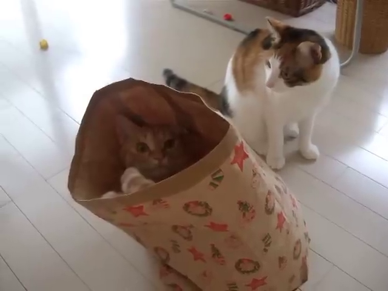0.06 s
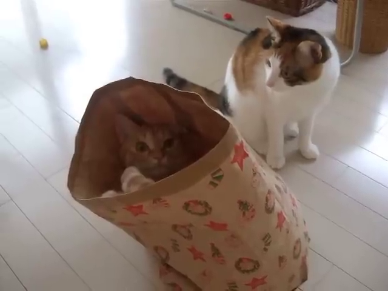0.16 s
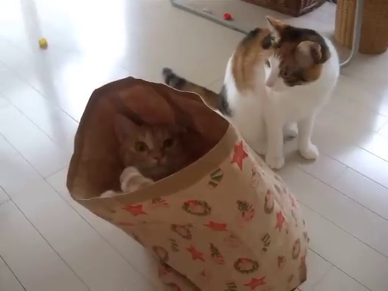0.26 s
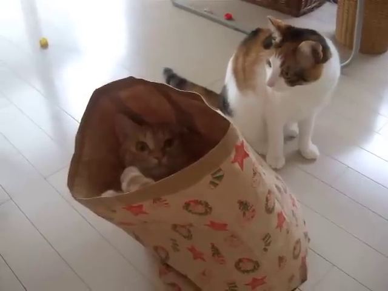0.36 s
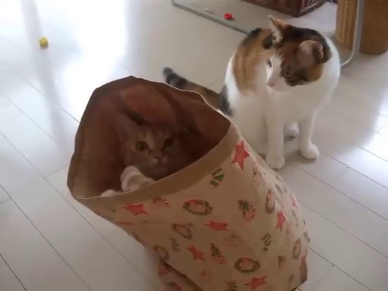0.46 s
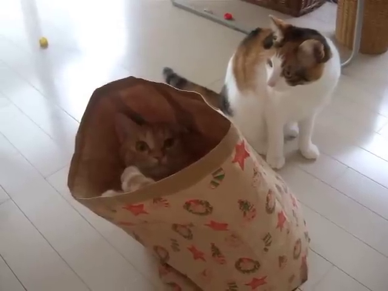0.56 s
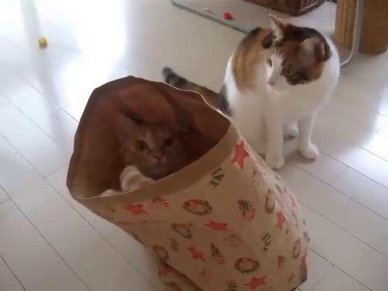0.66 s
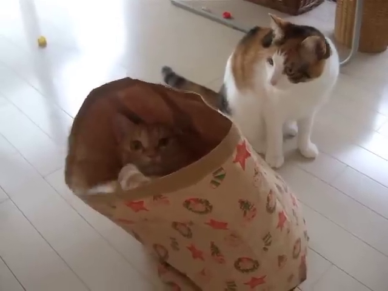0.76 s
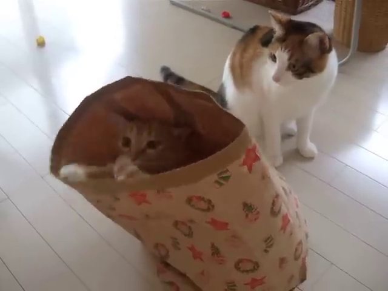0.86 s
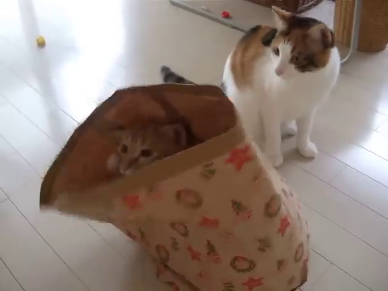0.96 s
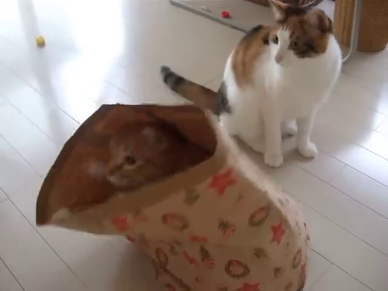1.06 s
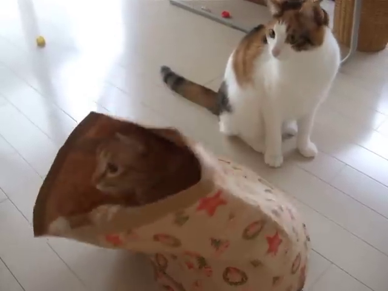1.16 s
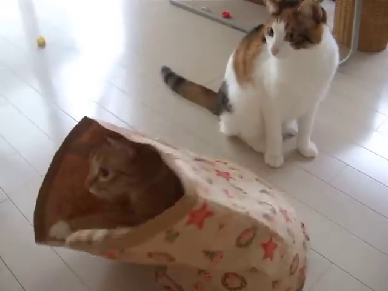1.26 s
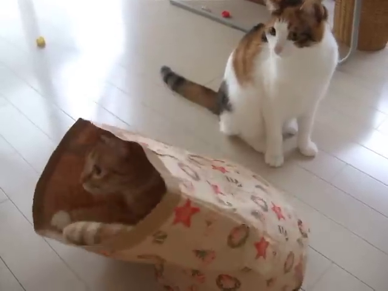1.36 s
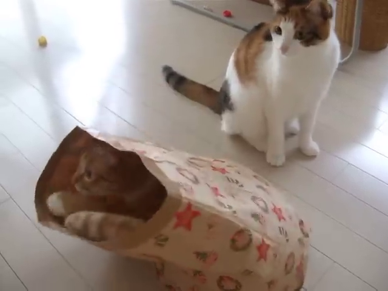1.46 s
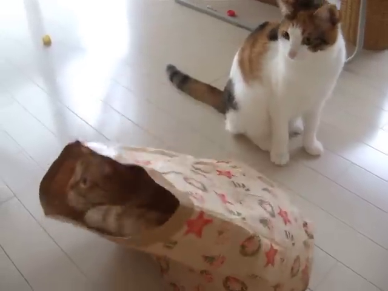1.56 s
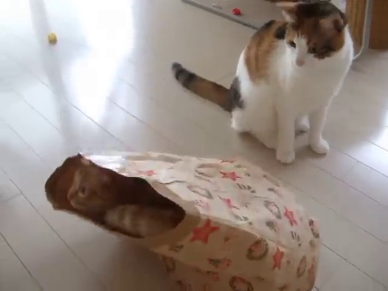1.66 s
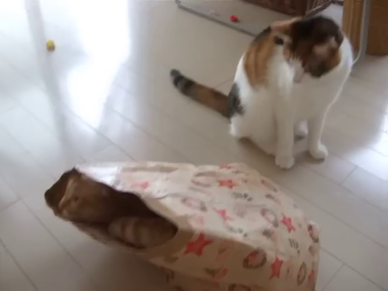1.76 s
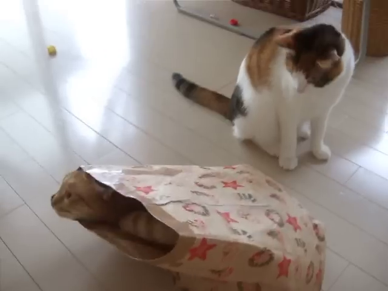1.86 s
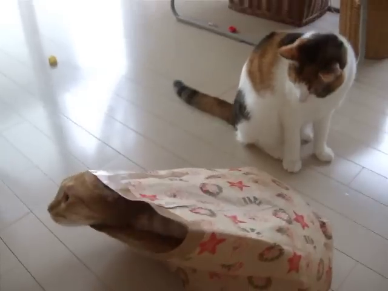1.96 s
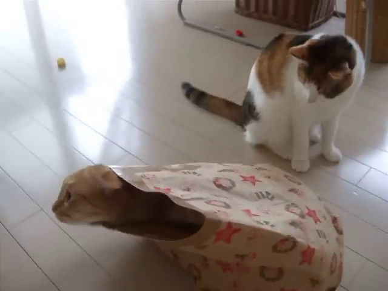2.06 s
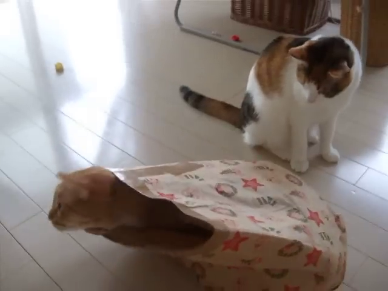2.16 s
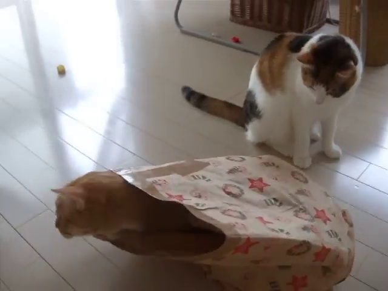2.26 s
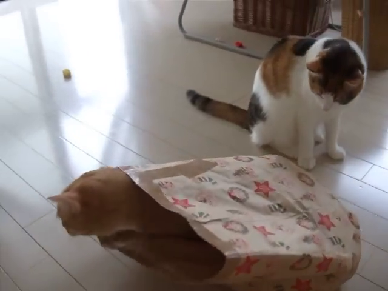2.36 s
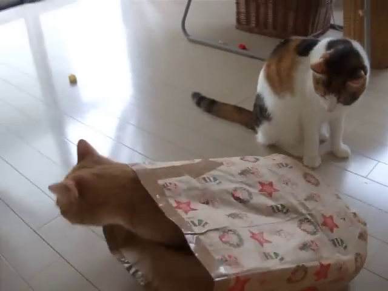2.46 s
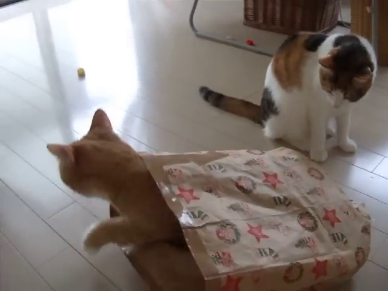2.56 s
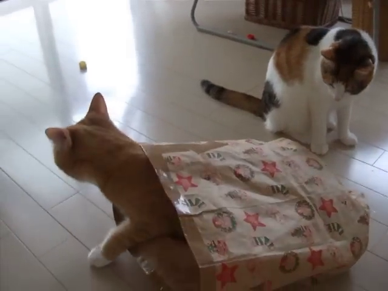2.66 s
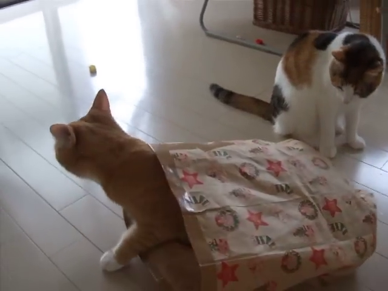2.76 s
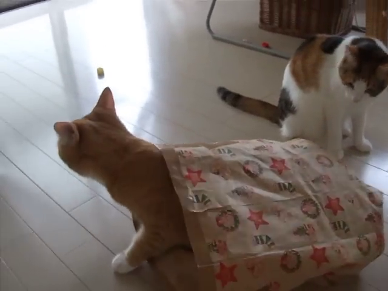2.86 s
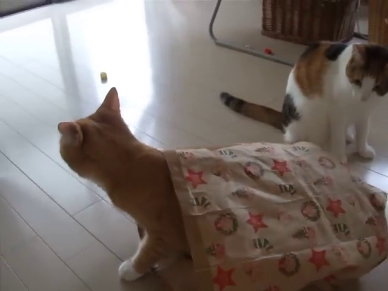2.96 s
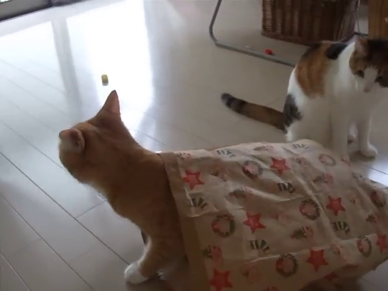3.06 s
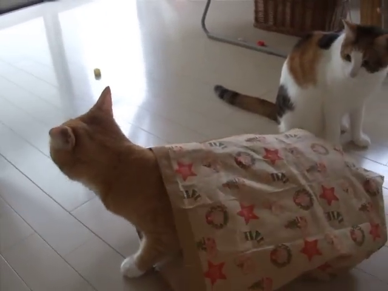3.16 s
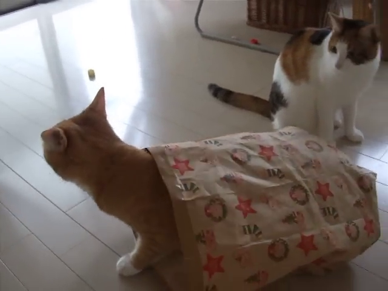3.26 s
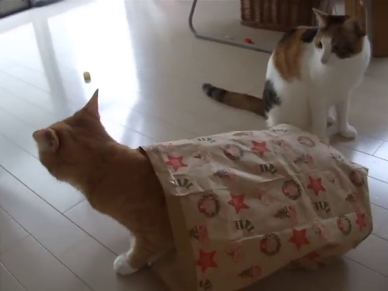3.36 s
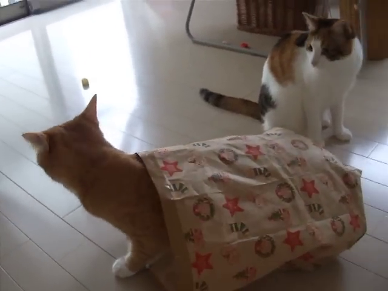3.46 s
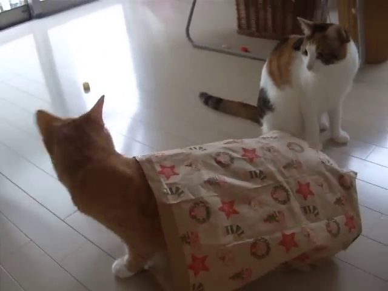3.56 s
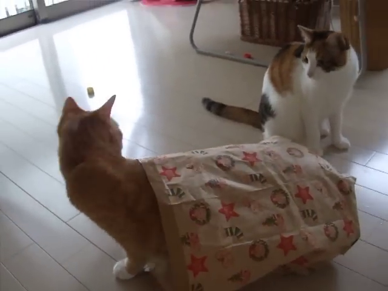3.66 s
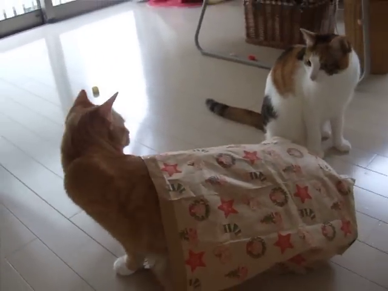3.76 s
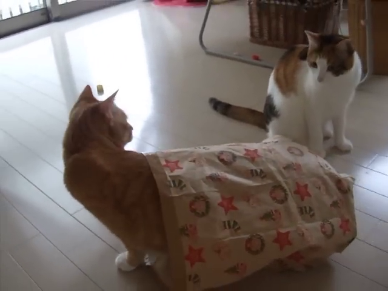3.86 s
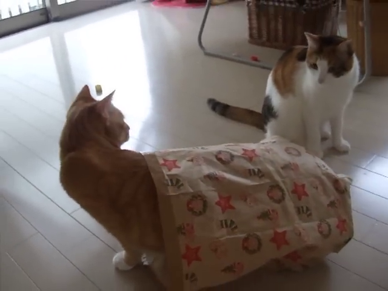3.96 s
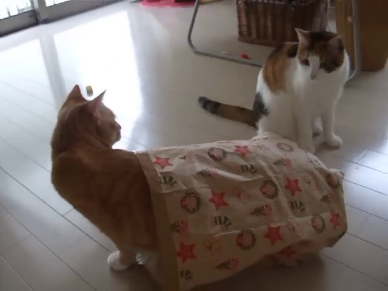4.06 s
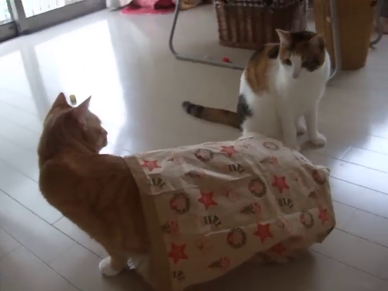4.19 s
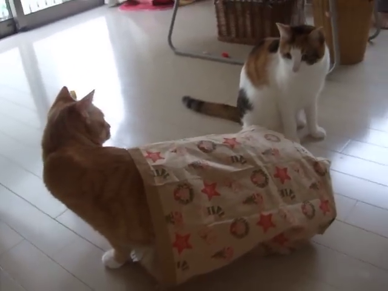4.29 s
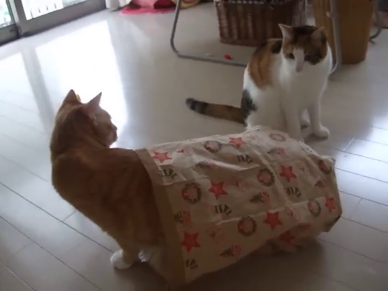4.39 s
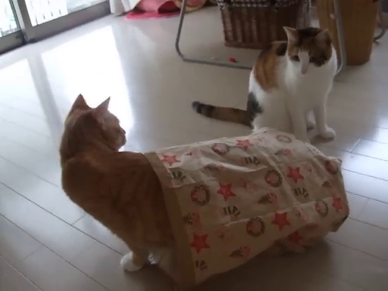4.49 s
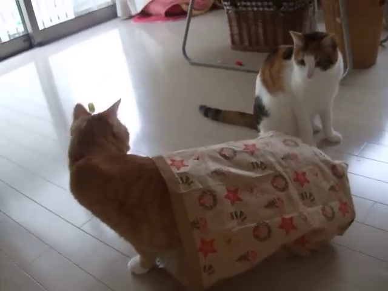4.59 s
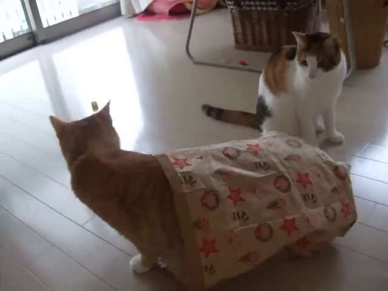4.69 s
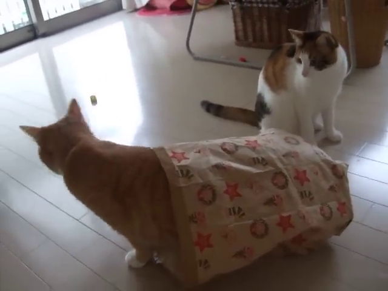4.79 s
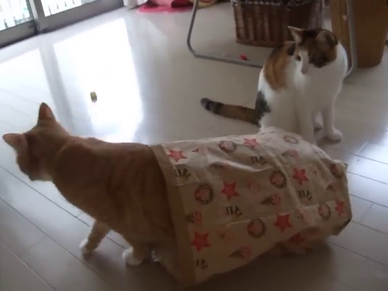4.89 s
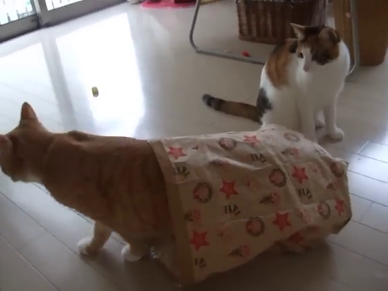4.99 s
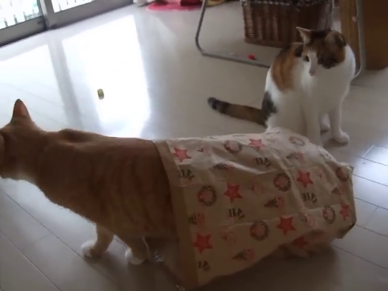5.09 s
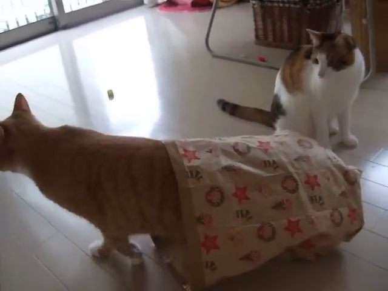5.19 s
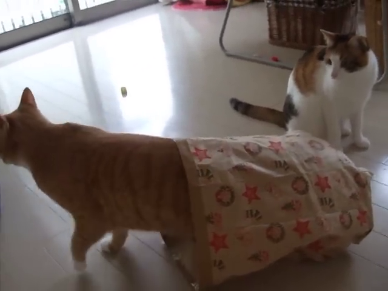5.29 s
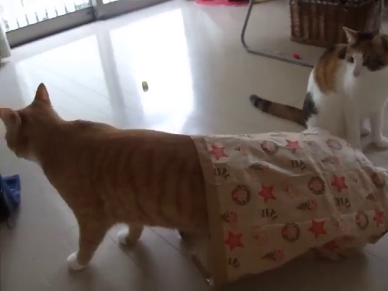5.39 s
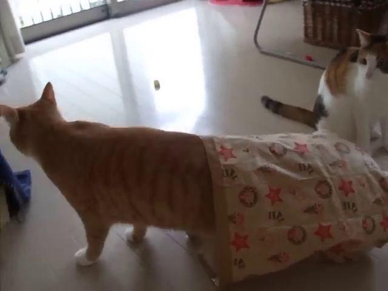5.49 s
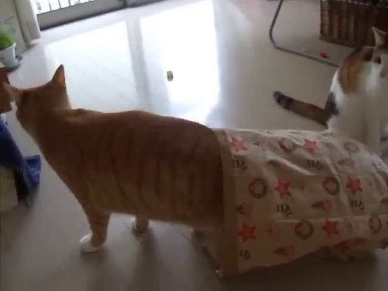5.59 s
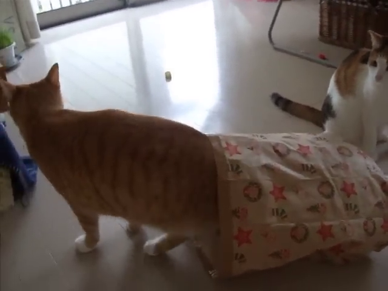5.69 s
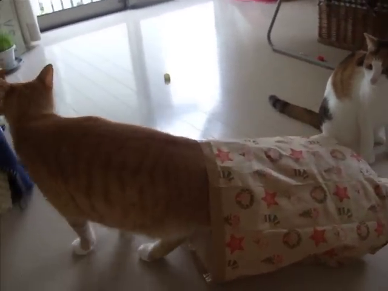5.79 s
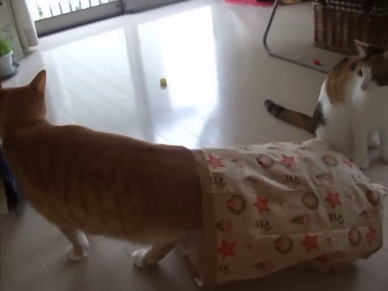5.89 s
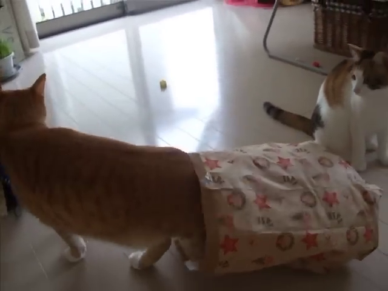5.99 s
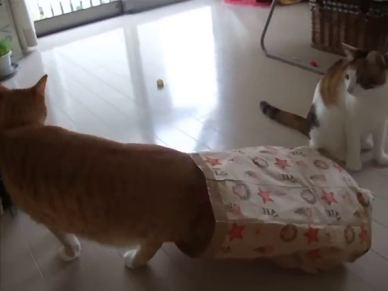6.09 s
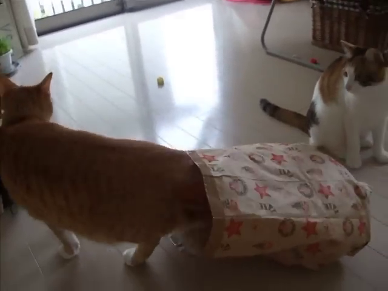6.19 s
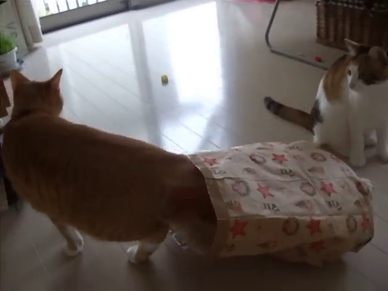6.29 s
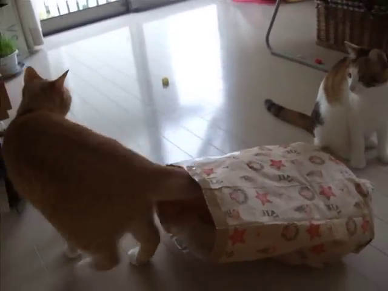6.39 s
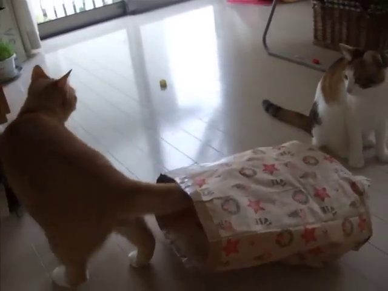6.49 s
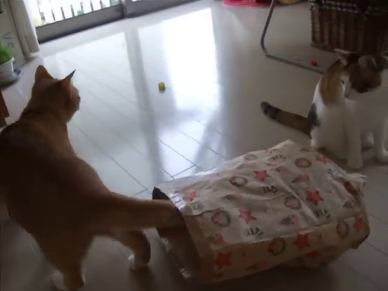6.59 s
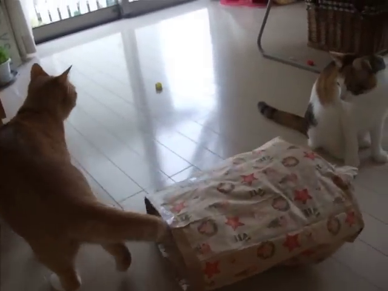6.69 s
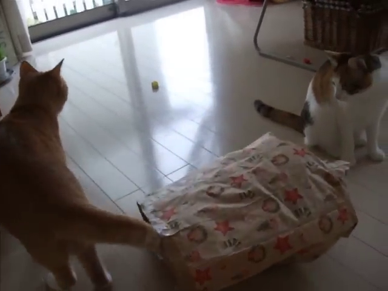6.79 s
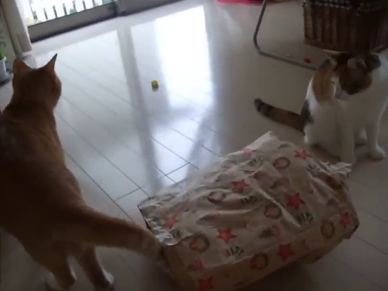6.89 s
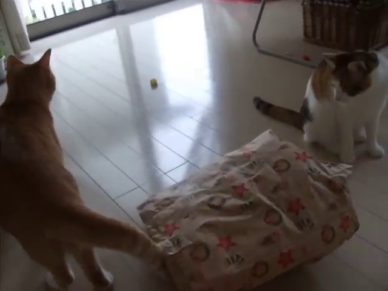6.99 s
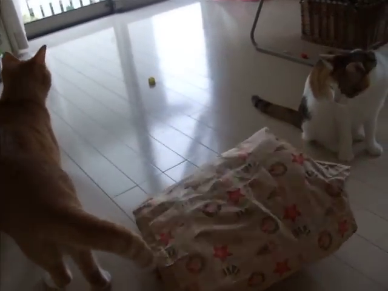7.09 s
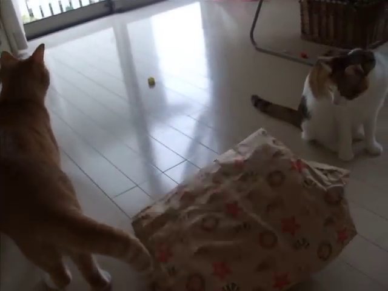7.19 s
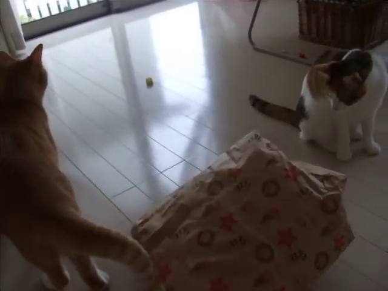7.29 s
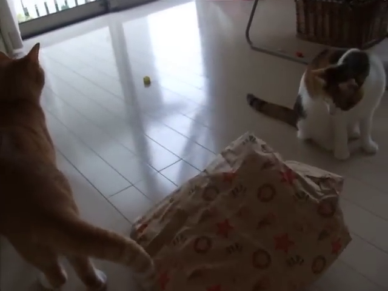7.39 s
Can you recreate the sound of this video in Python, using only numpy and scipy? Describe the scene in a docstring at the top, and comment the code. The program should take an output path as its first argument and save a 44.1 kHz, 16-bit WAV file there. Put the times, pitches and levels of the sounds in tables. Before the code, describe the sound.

A small indoor room with a wooden floor, heard through a modest camera microphone with faint, grainy hiss and limited treble. Almost quiet until 0.75 s, when a cat starts scrambling in a stiff paper bag. A very sharp cluster of snaps hits at 0.9-1.05 s, followed by uneven crackles, flexing panels and dry sliding rustle. From 1.8 to 2.6 s the crinkling is dense again, with soft patter as the bag tips onto the boards; snaps thin out by 3.4 s. Short room reflections follow them. Afterwards come sparse, soft bumps and light paper brushes, with deep booming knocks through the camera from 3.25 s, strongest near 4.2 s. Two crisp snaps stand out at 4.65 and 4.75 s. Around 7.0 s a brief, dry, high creak slips right at the microphone, leaving a faint metal ring. A last small paper snap and bump come at 7.4 s.

```python
"""A small live room with a wooden floor: a faint hiss of shaped noise, then a cat scrambles in a stiff paper
bag. Creases snap as millisecond noise bursts, panels crinkle in clumps of tiny clicks, and paper slides as a
dense hiss. As the bag tips over it patters on the boards; soft bumps, each a short damped swing, go on as the
cat walks out. Deep booming knocks come through the camera body from midway, followed by fainter low booms. Near
the end something creaks right at the microphone, sticking and slipping, and leaves a faint metal ring; the room
answers the bag, and one late snap follows."""
import sys
import numpy as np
from scipy import signal
from scipy.fft import rfft, irfft
from scipy.io import wavfile
from scipy.ndimage import map_coordinates

SR = 44100
rng = np.random.default_rng(int(sys.argv[2]) if len(sys.argv) > 2 else 0)


def wav_out(sig):
    """Save sig, one row per channel (or a flat mono array), as 16-bit PCM at SR to the path in sys.argv[1]."""
    wavfile.write(sys.argv[1], SR, np.round(np.clip(np.atleast_2d(sig).T, -1, 1) * 32767).astype(np.int16))


N = 328358
TIME = np.arange(N) / SR
BURST_TIME = TIME[:2048]


def from_db(db):
    """Turn decibels into an amplitude factor."""
    return 10 ** (np.asarray(db) / 20)


def rms_one(x):
    """Scale a sound to rms 1."""
    return x / np.sqrt(np.mean(x ** 2) + 1e-20)


def at_hz(points, hz):
    """Read a table on a log-frequency axis."""
    table_hz, value = np.transpose(points)
    return np.interp(np.log(np.maximum(hz, 1)), np.log(table_hz), value)


def causal_response(spectrum, size=2048):
    """Minimum-phase impulse response of a spectrum: nothing sounds before the blow."""
    hz = np.maximum(np.arange(size // 2 + 1) * SR / size, 1)
    octaves_outside = np.abs(np.log2(hz / np.clip(hz, spectrum[0][0], spectrum[-1][0])))
    # beyond the table the level falls 10 dB per octave, for two octaves
    level_db = at_hz(spectrum, hz) - 10 * np.minimum(octaves_outside, 2)
    cepstrum = irfft(np.log(from_db(level_db)))
    # folding the cepstrum onto positive time gives minimum phase
    cepstrum[1:size // 2] *= 2
    cepstrum[size // 2 + 1:] = 0
    return irfft(np.exp(rfft(cepstrum)))


def through(x, response):
    """Convolve, keeping the length."""
    return signal.oaconvolve(x, response)[:len(x)]


def drift(rate_hz):
    """Slow chance joining random knots of spread 1 by straight lines."""
    knots = rng.standard_normal(2000)
    return np.interp(TIME * rate_hz, np.arange(len(knots)), knots)


def add(out, s, sound):
    """Mix a sound in at time s."""
    i = max(round(s * SR), 0)
    out[i:i + len(sound)] += sound[:N - i]


def burst(response, rise_s, decay_s, jolt=0.0):
    """A quick run of tiny slips around one main jolt, through a body; its energy equals rms 1 over 10 ms."""
    rise = np.minimum(BURST_TIME / rise_s, 1) ** 2
    swell = rise * np.exp(-np.maximum(BURST_TIME - rise_s, 0) / decay_s)
    force = rng.standard_normal(len(BURST_TIME)) * swell / np.sqrt(np.sum(swell ** 2))
    force[np.argmax(swell)] += jolt * rng.choice([-1, 1])
    sound = through(force, response)
    return sound / np.sqrt(np.sum(sound ** 2) / (SR / 100))


def ring(hz, t60, t):
    """One mode dying by 60 dB in t60 seconds."""
    return np.sin(2 * np.pi * hz * t) * from_db(-60 * t / t60)


def grains(per_s, spread_db):
    """Clumps of tiny clicks of very unequal size; rms 1."""
    chance, size, sign = rng.random((3, N))
    born = chance < per_s * from_db(4 * drift(30)) / SR
    clicks = np.zeros(N)
    loudness_db = spread_db * np.minimum(-np.log(1 - size[born]), 3.5)
    clicks[born] = from_db(loudness_db) * np.sign(sign[born] - .5)
    return rms_one(clicks)


# Microphone noise and room rumble. Each row: frequency in Hz, relative density in dB per Hz.
HISS_SPECTRUM = [(15, -33), (25, -11.5), (46, -0.5), (120, -2), (200, -7.5), (360, -5.5), (700, -6.5),
                 (1400, -11), (2500, -11.5), (4000, -13), (7200, -11.5), (8200, -13)]
HISS_DB = -56


def hiss():
    """Faint microphone noise over a low room rumble, both one shaped white noise."""
    noise = through(rng.standard_normal(N), causal_response(HISS_SPECTRUM, size=8192))
    return from_db(HISS_DB) * rms_one(noise)


# How hard the cat works the bag. Each row: time in seconds, panel flexing and sliding in dB before each layer's trim.
SCRAMBLE_EFFORT = [(0.76, -50.5, -47.5), (0.9, -44, -42.5), (0.959, -28, -45.5), (1.119, -37.5, -47),
                   (1.2, -32, -38), (1.32, -41.5, -52), (1.38, -35.5, -40), (1.5, -49.5, -44),
                   (1.94, -32, -45.5), (2.159, -47, -36), (2.519, -33, -47.5), (2.74, -55.5, -50),
                   (2.86, -47.5, -50), (2.92, -43.5, -52), (3.079, -39.5, -42.5), (3.22, -52.5, -70),
                   (3.36, -44, -67.5), (3.46, -76, -65)]


def effort(t):
    """Levels in dB of flexing and sliding at time t; silent outside the scramble."""
    s, flexing, sliding = np.transpose(SCRAMBLE_EFFORT)
    return [np.interp(t, s, level, left=-200, right=-200) for level in (flexing, sliding)]


# Stiff facets of paper between creases. Each row: pitch in Hz, relative level in dB.
FACET_MODES = [(1500, -6), (2100, 4), (2900, -1.5), (4100, 1.5), (5600, 0), (7400, 5)]


def crinkle(per_s=230, cycles=6.1):
    """Small buckles, each ticking at the pitch of the facet where it happens; rms 1."""
    clicks = grains(per_s, spread_db=4.5)
    facet = rng.integers(0, len(FACET_MODES), N)
    ticks = [from_db(db) * rms_one(ring(hz, cycles / hz, TIME[:512])) for hz, db in FACET_MODES]
    return rms_one(sum(through(clicks * (facet == k), tick) for k, tick in enumerate(ticks)))


# Bag panels flexing; snaps shift it in pitch. Each row: frequency in Hz before that shift, relative dB per Hz.
FLEX_SPECTRUM = [(60, -17.5), (150, -16), (300, -5.5), (520, -6), (760, 2.5), (1030, 2), (1350, -12.5),
                 (1900, -19.5)]
# Paper dragged over fur and boards. Each row: frequency in Hz, relative density in dB per Hz.
SLIDE_SPECTRUM = [(200, -7.5), (800, 8), (1500, 8.5), (2200, 0), (4400, 6.5), (8200, 7)]


def scramble(panel_db=-9.5, crinkle_db=-9.5, slide_db=-2.5):
    """Flexing panels knock and crinkle in clumps; paper dragged over fur and boards gives a fine hiss."""
    flexing, sliding = from_db(effort(TIME))
    panels = rms_one(through(grains(per_s=170, spread_db=1.0), causal_response(FLEX_SPECTRUM)))
    slips = grains(per_s=6000, spread_db=3.0)
    slide = rms_one(through(slips, causal_response(SLIDE_SPECTRUM)))
    panel_layer = flexing * from_db(panel_db) * panels
    slide_layer = sliding * from_db(slide_db) * slide
    crinkle_layer = np.sqrt(flexing * sliding) * from_db(crinkle_db) * crinkle()
    return panel_layer + slide_layer + crinkle_layer


# The fallen bag pattering on the boards. Each row: frequency in Hz, relative density in dB per Hz.
PATTER_SPECTRUM = [(90, -9.5), (150, -1.5), (330, -1), (520, -5), (900, -28.5)]
TIP_START_S, TIP_END_S = 0.71, 2.63


def patter(patter_db=-14.5):
    """The further the bag has tipped, the louder its flexing panels pat the floor."""
    fallen = np.interp(TIME, [TIP_START_S, TIP_END_S], [0, 1])
    pats = rms_one(through(grains(per_s=90, spread_db=3.0), causal_response(PATTER_SPECTRUM)))
    return fallen * from_db(effort(TIME)[0] + patter_db) * pats


def small_snaps(count=50, crack_db=3.0, flex_db=2.5, edge_db=-7.0, spread_db=2.5):
    """Lesser creases give way at uneven moments all through the scramble, as hard as the paper is being worked."""
    when, size, brightness = rng.random((count, 3)).T * 2 - 1
    # one snap falls at a random moment within each of the equal slots
    slot = np.arange(count) + (1 + when) / 2
    s = np.interp(slot, [0, count], [SCRAMBLE_EFFORT[0][0], SCRAMBLE_EFFORT[-1][0]])
    flexing, sliding = effort(s)
    crack = flexing + crack_db + spread_db * (size + brightness)
    flex = flexing + flex_db + spread_db * size
    edge = sliding + edge_db + spread_db * (size + brightness)
    return np.transpose([s, crack, flex, edge])


# Loud creases buckling. Each row: time in seconds, then crack, panel flex and bright edge in dB before trim.
LOUD_SNAPS = [(0.7706, -35, -46, -43), (0.9193, -25, -34, -36), (0.9338, -16.5, -29, -30.5),
              (0.9466, -5.5, -27, -15.5), (0.9832, -8, -28, -14), (0.993, -16.5, -25.5, -18),
              (1.0266, -16.5, -20.5, -37), (1.1164, -30.5, -28, -46), (1.1822, -15, -30.5, -19.5),
              (1.2208, -13, -30.5, -22.5), (1.2461, -22, -28.5, -41), (1.3204, -22, -35.5, -40),
              (1.3568, -17.5, -32, -23.5), (1.4002, -17.5, -38.5, -25.5), (1.5421, -16.5, -34.5, -25.5),
              (1.6079, -21, -33.5, -48), (1.699, -17.5, -26.5, -21), (1.7283, -23.5, -32.5, -41),
              (1.8051, -28, -25, -34.5), (1.8206, -15.5, -35.5, -30), (1.8787, -19, -27, -25),
              (1.8875, -20, -28, -24.5), (1.915, -20, -25.5, -32), (1.93, -15.5, -25.5, -25.5),
              (1.9447, -13.5, -21, -22.5), (1.96, -14.5, -26.5, -23.5), (2.0008, -25.5, -23.5, -29),
              (2.016, -15, -33, -22.5), (2.0923, -31, -29.5, -39.5), (2.1964, -25.5, -33.5, -37),
              (2.2117, -21.5, -37, -36.5), (2.2619, -23, -26, -26), (2.2828, -13.5, -31, -25),
              (2.2959, -12, -27.5, -16.5), (2.3276, -9.5, -26.5, -26.5), (2.3844, -12, -20, -19.5),
              (2.4043, -11.5, -29.5, -26.5), (2.4789, -17.5, -35, -28.5), (2.5084, -14, -27.5, -19.5),
              (2.5157, -15.5, -27.5, -29.5), (2.547, -15.5, -27.5, -24.5), (2.6685, -22.5, -33.5, -35),
              (2.8884, -21, -31.5, -37.5), (2.9204, -15, -26, -29), (3.0028, -15.5, -23, -31),
              (3.0602, -16, -28.5, -26), (3.3224, -26.5, -34.5, -60), (4.6501, -16.5, -30.5, -38.5),
              (4.7445, -10, -21.5, -24), (7.3961, -22, -40, -49.5)]
# Sharp body of a snap. Each row: frequency in Hz, relative density in dB per Hz.
CRACK_SPECTRUM = [(900, -27), (1400, -2), (1750, 0.5), (2900, 1.5), (3700, -3), (4500, -4.5), (6000, -24.5)]
# Bright edge of a snap. Each row: frequency in Hz, relative density in dB per Hz.
EDGE_SPECTRUM = [(2600, -21), (3900, -0.5), (5000, 6.5), (7000, 8), (8200, 2)]
# the panels sound higher once the bag lies flattened on the floor
UPRIGHT_HZ, FALLEN_HZ = 808, 998


def snaps(rows, crack_db=-14.0, flex_db=-3.5, edge_db=-6.5, usual_hz=900, lead_s=0.0007):
    """A crease gives way within milliseconds and its panel swings a little longer."""
    out = np.zeros(N)
    crack_body, edge_body = causal_response(CRACK_SPECTRUM), causal_response(EDGE_SPECTRUM)
    for s, crack_level, flex_level, edge_level in rows:
        panel_hz = np.interp(s, [TIP_START_S, TIP_END_S], [UPRIGHT_HZ, FALLEN_HZ])
        flex_body = causal_response([(hz * panel_hz / usual_hz, db) for hz, db in FLEX_SPECTRUM])
        crack = burst(crack_body, rise_s=0.0017406, decay_s=0.0027, jolt=.6)
        flex = burst(flex_body, rise_s=0.002196, decay_s=0.0058, jolt=0.41)
        edge = burst(edge_body, rise_s=0.0011, decay_s=0.0019, jolt=0.56)
        snap = from_db(crack_level + crack_db) * crack
        snap = snap + from_db(flex_level + flex_db) * flex
        snap = snap + from_db(edge_level + edge_db) * edge
        add(out, s - lead_s, snap)
    return out


# Paws and slack paper on the floor. Each row: start in seconds, bump in dB before trim,
# pitch in Hz, paper brush in dB before trim.
FLOOR_BUMPS = [(0.841, -31.5, 765, -45), (1.064, -30, 614, -33), (1.434, -31.5, 780, -45),
               (1.627, -24, 732, -35.5), (1.896, -23, 755, -28), (2.179, -28, 870, -27.5),
               (2.424, -26, 415, -34.5), (2.828, -40, 286, -46.5), (3.133, -31, 836, -56),
               (3.25, -34.5, 340, -36.5), (3.568, -37, 476, -48.5), (3.86, -40.5, 748, -56),
               (3.914, -39.5, 563, -49), (4.166, -35, 231.5, -41.5), (4.477, -38.5, 704, -55),
               (4.993, -43, 321.8, -58.5), (5.563, -43, 410, -57.5), (5.973, -45.5, 876, -43.5),
               (6.03, -34, 480, -60.5), (6.343, -40, 288, -60), (6.517, -45, 380.6, -54.5),
               (6.763, -40.5, 388, -37.5), (7.233, -41.5, 384, -36), (7.396, -28, 424, -26.5)]
# Slack paper brushing the floor. Each row: frequency in Hz, relative density in dB per Hz.
BRUSH_SPECTRUM = [(500, -7), (900, -0.5), (1450, 1), (2200, -6), (4000, -16), (7500, -17.5)]


def bumps(bump_db=-7.5, brush_db=-9.0, cycles=6.7):
    """A soft push sets a slack panel swinging for a few cycles, with a light brush of paper."""
    out = np.zeros(N)
    brush_body = causal_response(BRUSH_SPECTRUM)
    soft = signal.butter(2, 1100, fs=SR, output="sos")
    for s, level, hz, brush_level in FLOOR_BUMPS:
        swing = signal.sosfilt(soft, np.diff(ring(hz, cycles / hz, BURST_TIME), prepend=0))
        bump = burst(swing, rise_s=0.00294, decay_s=0.0058, jolt=1.24)
        add(out, s, from_db(level + bump_db) * bump)
        brush = burst(brush_body, rise_s=0.0038, decay_s=0.0038, jolt=0.84)
        add(out, s, from_db(brush_level + brush_db) * brush)
    return out


# Deep knocks through the camera body, then from 5 s fainter low booms. Each row: start in seconds, level in dB
# before trim.
DEEP_THUMPS = [(3.249, -43), (4.176, -34), (4.999, -48.5), (5.729, -45), (5.889, -48.5), (6.25, -47),
               (6.799, -51.5)]


def thumps(hz=49.48, t60=0.73, ring_db=-7.0, knock_db=-10.0):
    """A dull knock together with a low, boomy ring that outlasts it."""
    out = np.zeros(N)
    dull = causal_response([(40, -24), (90, 20.5), (190, 5), (400, -33)])
    for s, level in DEEP_THUMPS:
        add(out, s, from_db(level + ring_db) * ring(hz, t60, TIME[:SR]))
        add(out, s, from_db(level + knock_db) * burst(dull, rise_s=0.0039, decay_s=0.053))
    return out


# Stick-slip of the close creak. Each row: start in seconds, shell and rasp in dB before trim.
CREAK_SLIPS = [(6.994, -26, -59), (7.001, -36, -28.5), (7.0066, -14, -26), (7.012, -24, -23),
               (7.02, -27, -33), (7.0327, -19.5, -42)]
# Modes of the creaking shell. Each row: frequency in Hz, relative level in dB, 60 dB decay in seconds.
SHELL_MODES = [(2800, 12.5, 0.0229), (2920, -3.5, .02), (2420, -10, 0.0124)]
# Scrape of each slip. Each row: frequency in Hz, relative density in dB per Hz.
RASP_SPECTRUM = [(300, -31), (800, -5), (1150, 1), (1600, -9), (2400, -3), (3000, 2.5), (3400, -15),
                 (4600, -12.5), (5400, -15), (6700, -7), (8300, -27.5)]
# Thin metal ringing on after the creak. Each row: frequency in Hz, starting level in dB, 60 dB decay in seconds.
METAL_RING = [(684, -52, 1.2), (1771, -64, 1.1), (2433, -62, 1.1), (2680, -59, 0.9)]


def creak(shell_db=-10.5, rasp_db=-2.5):
    """A hard shell sticks and slips close to the microphone, so it has no room around it."""
    out = np.zeros(N)
    rasp_body = causal_response(RASP_SPECTRUM)
    shell = sum(from_db(db) * ring(hz, t60, BURST_TIME) for hz, db, t60 in SHELL_MODES)
    # the band filter makes the shell swell into its note
    swell_band = signal.butter(2, [2100, 3300], "band", fs=SR, output="sos")
    shell = signal.sosfilt(swell_band, shell)
    for s, level, rasp_level in CREAK_SLIPS:
        slip = burst(shell, rise_s=.0006, decay_s=0.002, jolt=0.81)
        add(out, s, from_db(level + shell_db) * slip)
        rasp = burst(rasp_body, rise_s=0.00158, decay_s=0.0065)
        add(out, s, from_db(rasp_level + rasp_db) * rasp)
    metal = sum(from_db(db) * ring(hz, t60, TIME[:SR]) for hz, db, t60 in METAL_RING)
    add(out, 7.02, metal)
    return out


# How long the room rings. Each row: frequency in Hz, 60 dB decay in seconds.
ROOM_DECAY = [(125, 0.18), (800, 0.42), (2500, 0.45), (8000, 0.65)]
# How strongly the room answers. Each row: frequency in Hz, tail in dB against the sound sent into it.
ROOM_LEVEL = [(125, -3), (800, -5), (2500, -5.5), (4000, -6.5), (8000, -9)]


def room_tail(first_echo_s=0.0054, build_s=0.0023):
    """Dense reflections arrive after a short gap and linger longer in the treble."""
    size, tail = 24576, 0
    t, hz = TIME[:size], np.arange(size // 2 + 1) * SR / size
    octave = np.clip(np.log2(np.maximum(hz, 1) / 125), 0, 6)
    white = rfft(rng.standard_normal(size))
    for k in range(7):
        centre_hz = 125 * 2 ** k
        band = irfft(white * np.maximum(1 - np.abs(octave - k), 0), size)
        build = np.clip((t - first_echo_s) / build_s, 0, 1)
        fade = build * from_db(-60 * t / at_hz(ROOM_DECAY, centre_hz))
        level = from_db(at_hz(ROOM_LEVEL, centre_hz))
        tail = tail + band * fade / np.sqrt(np.sum(fade ** 2)) * level
    return tail


def room(x, tails, size=8192):
    """The bag keeps moving and turning, so successive stretches meet different reflections, in rotation."""
    out = np.zeros(N)
    for k, i in enumerate(range(0, N, size)):
        add(out, i / SR, signal.fftconvolve(x[i:i + size], tails[k % len(tails)]))
    return out


def scene(snap_room_db=-1.0, bump_room_db=0.0):
    """The near and far faces of the bag radiate each snap differently into the room; creak and thumps are direct."""
    creases = np.vstack([LOUD_SNAPS, small_snaps()])
    front, back = snaps(creases), snaps(creases)
    rustle, steps = scramble() + patter(), bumps()
    tails = [room_tail() for _ in range(4)]
    # the two faces share the power sent into the room
    send = from_db(snap_room_db) / np.sqrt(2)
    near_room = room(send * front + rustle, tails)
    far_room = room(send * back + from_db(bump_room_db) * steps, tails[::-1])
    direct = front + rustle + steps + thumps() + creak() + hiss()
    return (direct + near_room + far_room)[None, :]


CUTOFF_HZ = 8600
CONVERTER_HZ, CONVERTER_STEP = 16000, 0.0055   # sampling rate in Hz, step as a fraction of full scale


def record(dry):
    """A small camera's coarse converter: faint noise flips it between steps as hiss, stalling under a deep boom."""
    offset = -0.43 * CONVERTER_STEP
    narrow = signal.cheby1(12, .2, CUTOFF_HZ, fs=SR, output="sos")
    ticks = np.arange(0, N / SR, 1 / CONVERTER_HZ)
    sampled = map_coordinates(signal.sosfilt(narrow, dry[0]), [ticks * SR]) + offset
    stepped = CONVERTER_STEP * np.round(sampled / CONVERTER_STEP)
    restored = signal.resample_poly(stepped, SR, CONVERTER_HZ)[:N]
    return signal.sosfilt(narrow, restored)[None, :]


dry = scene()
out = record(dry)
wav_out(out)
```